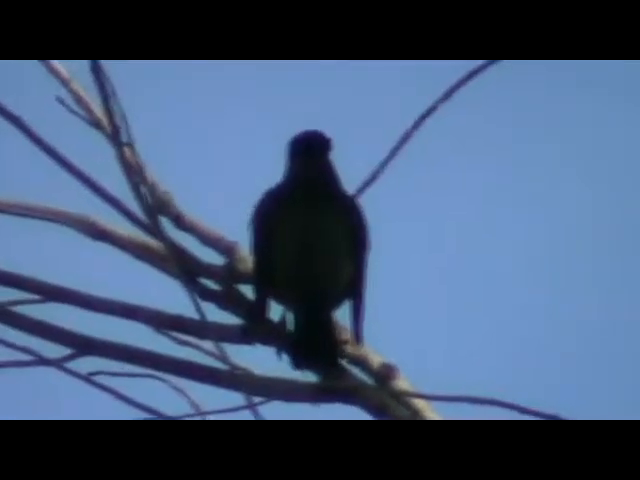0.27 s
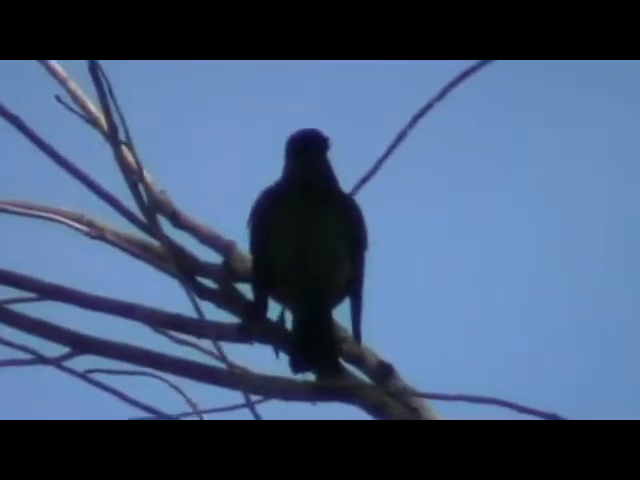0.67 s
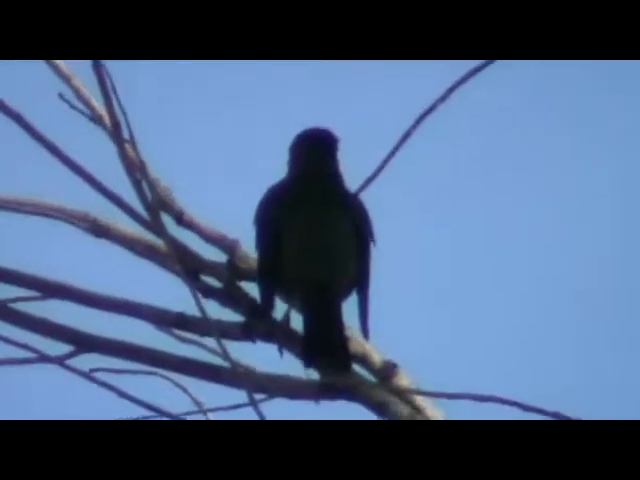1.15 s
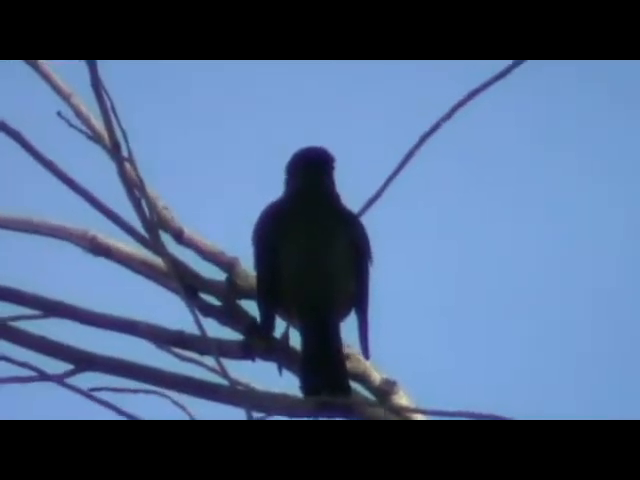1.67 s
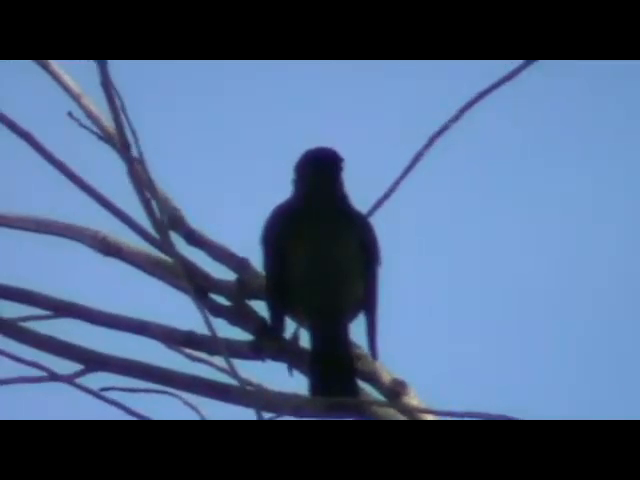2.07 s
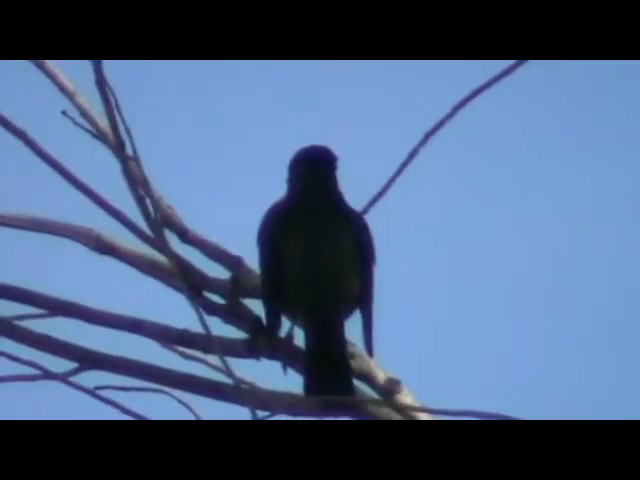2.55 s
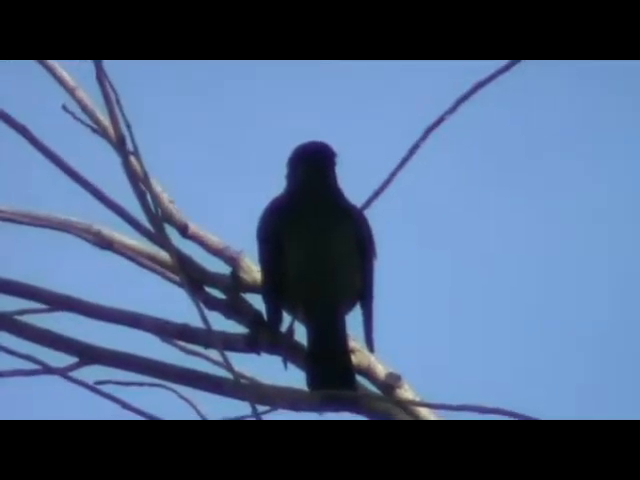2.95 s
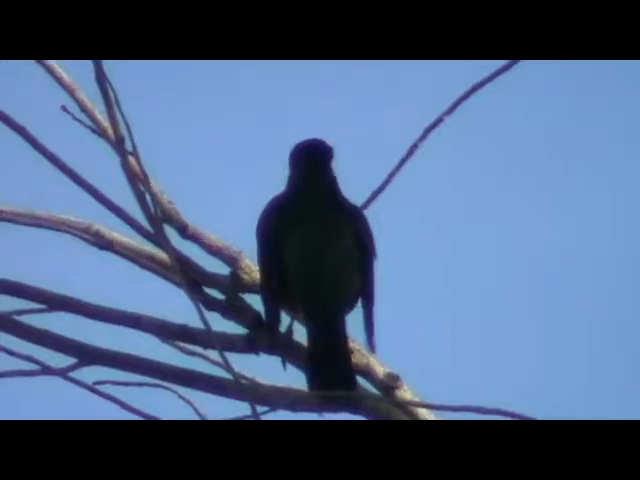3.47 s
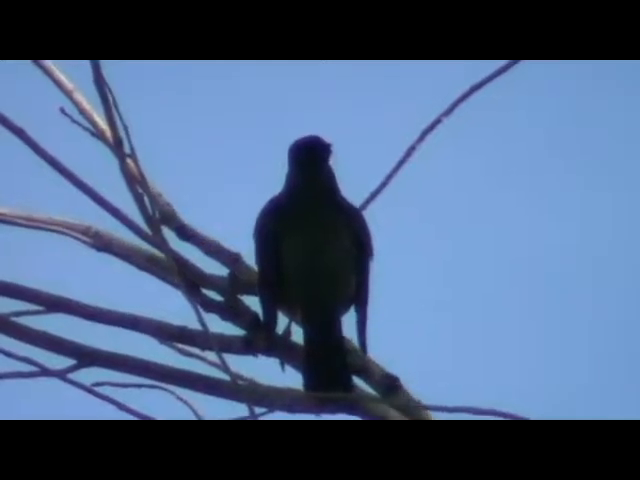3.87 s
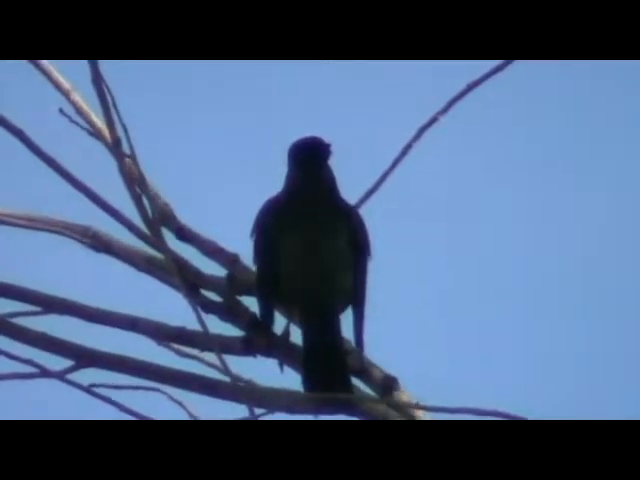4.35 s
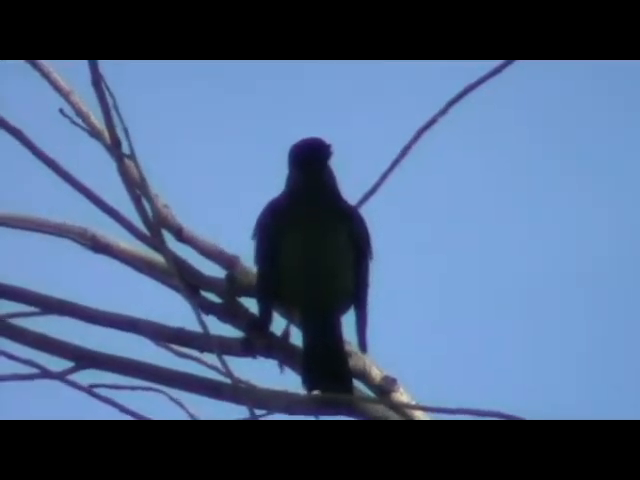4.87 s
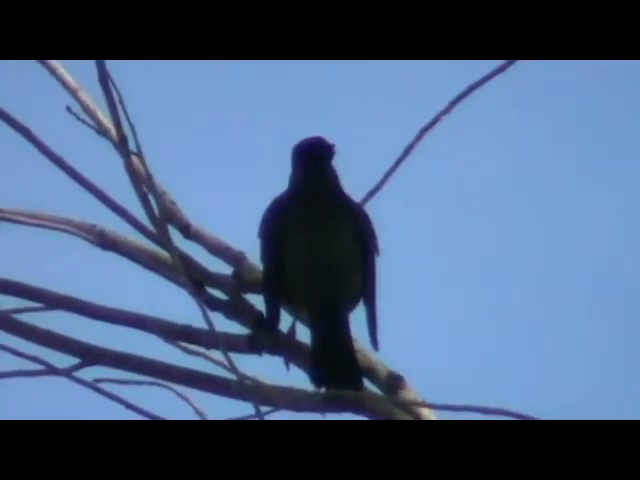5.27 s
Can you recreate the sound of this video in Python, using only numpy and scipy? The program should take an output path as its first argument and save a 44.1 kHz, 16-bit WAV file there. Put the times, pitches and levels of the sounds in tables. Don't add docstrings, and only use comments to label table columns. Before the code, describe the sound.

Outdoor birdsong over a busy road, through a small camera microphone with faint hiss and a very high whine. From 0 to 0.5 s wind bumps low and heavy, a left-hand bird chips rapidly, a thrush gives brief whistles, and the lens drive twitches faintly near 0.27 s. Total silence from 0.5 to 0.85 s. Sound returns with less wind and strong arched whistles until 1.05 s, then another quick group at 1.4-1.6 s. Light twig rustle settles around 1.8 s. A sharp plastic tick lands at 2.0 s. Road roar continues slightly left; a lorry drone drops in pitch around 2.1-2.7 s. A thin call at 2.9 s precedes wavering whistles at 3.4-3.6 s and a faint tick. Twisting notes come at 4.1 s, wavering descending ones at 4.5-4.8 s. Left chips quicken from 4.8 s, a fast high trill peaks at 5.2 s, then a distant falling whistle as an engine climbs.

```python
import sys
import numpy as np
from scipy import signal
from scipy.fft import rfft, irfft, next_fast_len
from scipy.io import wavfile
from scipy.ndimage import uniform_filter1d, map_coordinates

SR = 44100
rng = np.random.default_rng(int(sys.argv[2]) if len(sys.argv) > 2 else 0)


def amplitude_ratio(level_db):
    exponent = np.asarray(level_db, float) / 20
    return 10 ** exponent


def to_wav(s):
    ch = np.atleast_2d(s).T
    pcm = np.round(np.clip(ch, -1, 1) * 32767)
    wavfile.write(sys.argv[1], SR, pcm.astype(np.int16))


N = 242550


def along(points, hz):
    f, v = np.transpose(points)
    return np.interp(np.log(hz + 1), np.log(f + 1), v)


def unit(x):
    return x / np.sqrt(np.mean(x ** 2) + 1e-20)


def curves(rows):
    s, *cols = np.transpose(rows)
    return [np.interp(np.arange(N) / SR, s, c) for c in cols]


def wobble(rate_hz):
    knots = rng.standard_normal(int(N * rate_hz / SR) + 4)
    return map_coordinates(knots, [np.arange(N) * rate_hz / SR])


def filtered(x, response):
    m = next_fast_len(N + SR // 2)
    return irfft(rfft(x, m) * response(np.fft.rfftfreq(m, 1 / SR)), m)[..., :N]


def rush(spectrum, alike, patchy_db):
    z = signal.stft(rng.standard_normal((2, N)), nperseg=512)[2]
    field = rng.standard_normal(z.shape[1:])
    field = uniform_filter1d(uniform_filter1d(field, size=6, axis=0), size=14, axis=1)
    pair = signal.istft(z * amplitude_ratio(patchy_db * unit(field)), nperseg=512)[1][:, :N]

    def mid_side_response(hz):
        turn = np.arccos(np.clip(along(alike, hz), -1, 1)) / 2
        return amplitude_ratio(along(spectrum, hz)) * [np.cos(turn), np.sin(turn)]

    mid, side = filtered(pair, mid_side_response)
    return unit(np.array([mid + side, mid - side]))


def slurs(rows, swell_db, bow=0):
    notes = []
    for s, length, a, b, db in rows:
        middle_hz = (a + b) / 2 + bow * abs(a - b)
        notes.append([(s, a, db - swell_db / 2),
                      (s + length / 2, middle_hz, db + swell_db / 2),
                      (s + length, b, db - swell_db / 2)])
    return notes


def falls(rows, length_s, share):
    return [(s, length_s, hz * (1 + share / 2), hz * (1 - share / 2), db) for s, hz, db in rows]


def whistles(notes, fade_s, inertia_s, flutter_db, overtone_db):
    voice = np.zeros(N + SR, complex)
    half_fade = round(fade_s * SR / 2)
    for s, hz, db in map(np.transpose, notes):
        t = np.arange(round((s[-1] - s[0] + fade_s) * SR)) / SR
        at_s = t + s[0] - fade_s / 2
        inertia = round(inertia_s * SR)
        hz = uniform_filter1d(np.interp(at_s, s, hz), inertia, mode='nearest')
        db = uniform_filter1d(np.interp(at_s, s, db), inertia, mode='nearest')
        edges = np.sin(np.pi / 2 * np.clip(np.minimum(t, t[-1] - t) / fade_s, 0, 1)) ** 2
        first = round((s[0] - fade_s / 2) * SR) + SR // 2
        turns = 2 * np.pi * np.cumsum(hz) / SR
        turns += np.angle(voice[first + half_fade]) - turns[half_fade]
        voice[first:first + len(t)] += np.sqrt(2) * amplitude_ratio(db) * edges * np.exp(1j * turns)
    voice = voice[SR // 2:][:N] * amplitude_ratio(flutter_db * wobble(170))
    octave = voice ** 2 / (np.abs(voice) + 1e-9)
    return (voice + amplitude_ratio(overtone_db) * octave).real


def surroundings(x, t60_s, wet_db, wall_s, wall_db):
    t = np.arange(SR // 2) / SR
    scatter = rng.standard_normal((2, len(t))) * amplitude_ratio(-60 * t / t60_s) * (1 - np.exp(-t / 0.0071))
    answer = amplitude_ratio(wet_db) * scatter / np.linalg.norm(scatter[0])
    answer[0, round(wall_s * SR)] += amplitude_ratio(wall_db)
    answer[1, round((wall_s + .0001) * SR)] += amplitude_ratio(wall_db)
    return signal.fftconvolve(x[None], answer, axes=1)[:, :N]


# f/Hz, density/dB
HISS_SPECTRUM = [(1500, -29.5), (4000, -1), (8000, 3.5), (12000, 1.5), (14600, -0.5), (15300, 0.5),
                 (16000, -1.5)]
# f/Hz, left-right likeness
HISS_LIKENESS = [(4000, .3), (8000, 0.54), (14000, 0.82), (15300, 0.85)]


def amplifier_hiss():
    return amplitude_ratio(-52.5) * rush(HISS_SPECTRUM, HISS_LIKENESS, patchy_db=1.0)


# f/Hz, level/dB
CIRCUIT_TONES = [(10174, -80), (11725, -72)]
# t/s, t/s
BLANK_AT_S = (.0143, .0046)


def line_whistle():
    field_s, blank_s, blank_depth = .02, .0024, .86
    line_hz, line_db = 15625, -57
    t = np.arange(N) / SR
    steady = sum(np.sqrt(2) * amplitude_ratio(db) * np.sin(2 * np.pi * hz * t) for hz, db in CIRCUIT_TONES)
    blank_at_s = np.where(t < DROPOUT_S[1], *BLANK_AT_S)
    from_blank_s = (t - blank_at_s + field_s / 2) % field_s - field_s / 2
    gate = 1 - blank_depth * np.exp(-(from_blank_s / blank_s) ** 4)
    return steady + np.sqrt(2) * amplitude_ratio(line_db) * np.sin(2 * np.pi * line_hz * t) * gate


# t/s, peak/dB
LENS_TWITCHES = [
    (.2732, -39),
    (.2781, -37),
]


def lens_drive():
    ring_hz, width_hz = 13400, 2600
    sparks = np.zeros(N)
    for s, db in LENS_TWITCHES:
        sparks[round(s * SR)] = amplitude_ratio(db + 12)

    def ring(f):
        return (1j * f * width_hz / (ring_hz ** 2 - f * f + 1j * f * width_hz)) ** 2

    return filtered(sparks, ring)


# t/s, peak/dB, left minus right/dB
BODY_TICKS = [
    (2.0161, -25.8, -5),
    (3.5638, -41.5, 8),
]
# f/Hz, width/Hz, level/dB
SHELL_MODES = [(3200, 800, 8), (4800, 1500, 10), (7760, 2200, 7), (13500, 2500, 0)]


def body_ticks():
    slips = [(.0011, -5), (.0014, 1), (.0016, -4), (.002, -8), (.0024, -5)]  # t/s, level/dB
    blows = np.zeros((2, N))
    for s, db, pan_db in BODY_TICKS:
        for late_s, slip_db in slips:
            side_db = pan_db / 2 * np.array([1, -1])
            blows[:, round((s + late_s) * SR)] += amplitude_ratio(db + slip_db + 13.0 + side_db)

    def shell(f):
        modes = sum(amplitude_ratio(db) * 1j * f * w / (c * c - f * f + 1j * f * w) for c, w, db in SHELL_MODES)
        return modes / (1 + 1j * f / 6000)

    return filtered(blows, shell)


def camera():
    return amplifier_hiss() + line_whistle() + lens_drive() + body_ticks()


# f/Hz, density/dB
TWIG_SPECTRUM = [(2000, -32.5), (3500, -4), (5000, 1), (7000, -6.5), (11000, -31)]


def breeze():
    breeze_db, calm_db, settles_s, settling_s = -56, -64, 1.8, .1
    calm = 1 / (1 + np.exp((settles_s - np.arange(N) / SR) / settling_s))
    level_db = breeze_db + (calm_db - breeze_db) * calm
    return amplitude_ratio(level_db) * rush(TWIG_SPECTRUM, [(5000, .4)], patchy_db=4.0)


# t/s, wind and rumble level/dB, roar level/dB
TRAFFIC_LEVELS = [(0, -19.5, -37.5), (.11, -25, -38.5), (.49, -25, -36.5), (.86, -43, -38),
                  (1.07, -34.5, -37.5), (1.3, -41, -36.5), (1.6, -44.5, -37), (2.02, -42.5, -35),
                  (2.23, -46, -37), (2.49, -40, -36.5), (3.47, -45.5, -36.5), (3.9, -43, -37.5),
                  (5.25, -46.5, -36), (5.5, -44.5, -37)]
# f/Hz, density/dB
RUMBLE_SPECTRUM = [(15, -23.5), (30, -7), (60, -0.5), (120, -1.5), (200, -10), (350, -21), (600, -54.5)]
# f/Hz, gain/dB
GUST_COLOUR = [(100, 0), (200, 1), (380, 5.5), (600, 4.5)]
# f/Hz, left port lag/rad
GUST_LAG = [(40, .3), (120, .9), (260, 1.2), (600, .5)]
# f/Hz, density/dB
TYRE_SPECTRUM = [(88, -43.5), (150, -7.5), (214, -8), (375, -5.5), (441, -4.5), (470, -5.5), (866, -1.5),
                 (1100, -5.5), (1420, -6.5), (2030, -11.5), (2460, -15), (3180, -19.5), (7000, -32),
                 (9100, -64), (15400, -120)]
# f/Hz, left-right likeness
TYRE_LIKENESS = [(150, 1), (300, 0.6), (640, 0.77), (1400, 0.36), (3000, 0.12), (7000, 0.11)]
# f/Hz, left minus right/dB
TYRE_PAN = [(60, -2.5), (110, -3.5), (200, 2), (380, 0.5), (700, 4.5), (1290, 4.5), (2380, 7), (4400, 2),
            (8120, 2.5), (15000, -4.5)]
# f/Hz, left port lead/rad
TYRE_LEAD = [(150, 0), (350, .25), (1000, .7), (2200, 0.6), (4000, 0)]


def road():
    rumble_db, roar_db = curves(TRAFFIC_LEVELS)
    windy = np.arange(N) < DROPOUT_S[1] * SR
    sides = np.array([[1], [-1]]) / 2

    lumps = amplitude_ratio(2.2 * wobble(18))
    alike = [(30, .9), (70, .85), (150, .62), (300, .4)]  # f/Hz, likeness
    rumble = unit(lumps * rush(RUMBLE_SPECTRUM, alike, patchy_db=0.5))
    rumble = amplitude_ratio(rumble_db + np.where(windy, -3.5, 4.5)) * rumble

    def gust(hz):
        return amplitude_ratio(along(GUST_COLOUR, hz)) * np.exp(-1j * along(GUST_LAG, hz) * sides)

    rumble = np.where(windy, filtered(rumble, gust), rumble)

    def lean_left(hz):
        return amplitude_ratio(along(TYRE_PAN, hz) * sides) * np.exp(1j * along(TYRE_LEAD, hz) * sides)

    spectrum = [(60, -67.5)] + TYRE_SPECTRUM + [(14000, -67.5)]
    roar = filtered(rush(spectrum, TYRE_LIKENESS, patchy_db=0.16), lean_left)
    return rumble + amplitude_ratio(roar_db + 2.0 + 0.39 * wobble(6)) * roar


# t/s, firing f/Hz, level/dB
BRAKING_LORRY = [
    (.85, 110.9, -38),
    (1.2, 109.8, -52),
    (1.7, 109.5, -38),
    (2.14, 108.6, -35),
    (2.35, 102.5, -39.5),
    (2.7, 95.8, -55),
]
# t/s, firing f/Hz, level/dB
CLIMBING_LORRY = [
    (2.8, 66, -46),
    (3.3, 67.43, -41),
    (3.65, 66.4, -38),
    (4, 67.5, -44),
    (4.6, 68.2, -41.5),
    (5, 68.3, -37),
    (5.5, 70.1, -34.5),
]
# from t/s, to t/s, from f/Hz, to f/Hz, loudest level/dB
ENGINE_PASSES = [(0, .45, 100.6, 111.5, -37), (0, .45, 61, 76, -35), (0, .45, 142.5, 149, -37),
                 (2.35, 3, 109.8, 111.5, -44), (.9, 2.05, 135, 138.5, -40), (.9, 2.2, 187, 191.5, -49),
                 (.85, 2.2, 76.5, 74.5, -42), (3.25, 3.65, 141.5, 143.5, -37),
                 (4.05, 5.5, 144.5, 149.5, -37), (3.6, 5, 134, 137, -35.5), (3.5, 4, 95, 80.5, -47),
                 (4.3, 5.5, 83, 86, -40)]


def drones():
    octave_db, fade_db = -14.5, 6.5
    octave = [(s, 2 * hz, db + octave_db) for s, hz, db in BRAKING_LORRY]
    passes = [(s, end - s, a, b, db - fade_db / 2) for s, end, a, b, db in ENGINE_PASSES]
    return [BRAKING_LORRY, octave, CLIMBING_LORRY] + slurs(passes, swell_db=fade_db)


def engines():
    hum, t = np.zeros((2, N)), np.arange(N) / SR
    for rows in drones():
        hz, db = curves(rows)
        present = np.clip(np.minimum(t - rows[0][0] + 0.16, rows[-1][0] + 0.15 - t) / 0.13, 0, 1)
        turns = 2 * np.pi * np.cumsum(hz) / SR + 0.27 * wobble(7.2)
        apart_rad = rng.uniform(.14, .4) * np.array([[1], [-1]])
        hum += present * np.sqrt(2) * amplitude_ratio(db + 2.5 * wobble(9)) * np.sin(turns + apart_rad)
    return hum * amplitude_ratio([[.4], [-.4]])


# t/s, middle f/Hz, level/dB
CHIPS = [(.044, 3500, -42), (.124, 2950, -41), (.217, 3000, -47), (.292, 3010, -43), (.41, 2970, -45),
         (.44, 2146, -42.5), (1.307, 3890, -49.5), (4.794, 2970, -43), (4.875, 3000, -48),
         (4.953, 2920, -44), (5.03, 3500, -45), (5.113, 2900, -36), (5.185, 2870, -41), (5.263, 2930, -45),
         (5.342, 3240, -43), (5.422, 2700, -42.5), (5.493, 4600, -47.5)]
# t/s, f/Hz, level/dB
SWOOP = [
    (.355, 5850, -38.5),
    (.359, 5020, -31),
    (.363, 4380, -40),
    (.371, 3940, -42.5),
    (.379, 3640, -43),
]
# t/s, length/s, from f/Hz, to f/Hz, level/dB
THIN_TONES = [(.362, .013, 5200, 5030, -52), (2.905, .016, 5000, 6100, -48), (2.915, .012, 9000, 9400, -57),
              (4.34, .016, 6500, 6600, -63), (4.378, .016, 5850, 5750, -60), (4.39, .016, 5350, 5200, -61),
              (4.64, .03, 5720, 5600, -61), (4.745, .03, 5300, 5200, -61), (4.43, .012, 4500, 4800, -60),
              (4.52, .028, 4950, 5300, -54), (4.465, .02, 5050, 5000, -60), (4.35, .02, 7200, 5600, -63),
              (4.838, .014, 5250, 5150, -64), (3.425, .02, 5100, 5120, -56), (3.72, .018, 5250, 5200, -59),
              (4.941, .003, 5000, 4500, -49), (.211, .006, 4150, 3850, -44)]


def chipping_bird():
    chips = falls(CHIPS, length_s=.006, share=.22)
    calls = [SWOOP] + slurs(THIN_TONES + chips, swell_db=2.2, bow=.1)
    voice = whistles(calls, fade_s=.003, inertia_s=.002, flutter_db=3.5, overtone_db=-22)
    far = surroundings(voice, t60_s=.25, wet_db=-7, wall_s=0.027, wall_db=-27)
    return voice * amplitude_ratio([[4.], [-8.]]) + far


# t/s, length/s, top f/Hz, level/dB
TRILL_LOOPS = [
    (5.169, .034, 6750, -37),
    (5.204, .029, 6250, -35),
    (5.238, .026, 6050, -35),
]


def loops():
    from_hz, knee_hz, end_hz = 3850, 4850, 2700
    top, knee = .22, .62
    over_db, down_db, out_db = -8, -1, -7
    notes = []
    for s, length, top_hz, db in TRILL_LOOPS:
        notes.append([(s, from_hz, db),
                      (s + top * length / 2, (from_hz + top_hz) / 2, db),
                      (s + top * length, top_hz, db + over_db),
                      (s + knee * length, knee_hz, db + down_db),
                      (s + length, end_hz, db + out_db)])
    return notes


# t/s, f/Hz, level/dB
WIND_UP = [
    (5.085, 6100, -58),
    (5.105, 5900, -60),
    (5.115, 5720, -50),
    (5.131, 5450, -49),
    (5.141, 6900, -47),
    (5.148, 6150, -45),
    (5.16, 5400, -46),
    (5.169, 3850, -38),
]
# t/s, f/Hz, level/dB
RING_OUT = [
    (5.28, 4620, -43),
    (5.29, 4690, -46),
    (5.3, 4920, -51),
    (5.306, 4860, -49),
    (5.32, 4860, -50),
    (5.335, 4980, -51),
    (5.347, 4800, -52),
]
# t/s, length/s, from f/Hz, to f/Hz, level/dB
TRILL_END = [
    (5.2, .006, 2850, 2600, -40),
    (5.264, .006, 2950, 2750, -43),
    (5.257, .018, 6050, 6200, -55),
    (5.26, .018, 4300, 4900, -53),
    (5.28, .024, 5700, 6050, -51),
    (5.305, .013, 6100, 6250, -57),
    (5.281, .009, 4100, 2600, -46),
]
# t/s, length/s, from f/Hz, to f/Hz, level/dB
UNDERTONE = [
    (5.09, .034, 3800, 3900, -59),
    (5.172, .012, 4050, 3900, -49),
    (5.197, .01, 4200, 4700, -56),
    (5.217, .012, 3950, 4050, -47),
    (5.226, 0.013, 4850, 4750, -47),
    (5.267, .008, 3300, 4700, -50),
]
# f/Hz, gain/dB
BEAK = [(2500, -4), (3500, -0.5), (4800, 2.5), (6800, -3.5)]


def thrush_trill():
    notes = [WIND_UP, RING_OUT] + loops() + slurs(TRILL_END + UNDERTONE, swell_db=1.5)
    trill = whistles(notes, fade_s=.003, inertia_s=.003, flutter_db=1.3, overtone_db=-40)
    trill = filtered(trill, lambda hz: amplitude_ratio(along(BEAK, hz)))
    far = surroundings(trill, t60_s=.11, wet_db=-4, wall_s=.017, wall_db=-15)
    return trill * amplitude_ratio([[.6], [-.6]]) + far


# t/s, f/Hz, level/dB
ARCHES = [
    [(.882, 2374, -49), (.895, 2686, -35), (.905, 2805, -29.5), (.915, 3065, -37), (.924, 3120, -28),
     (.94, 3200, -30), (.952, 3157, -29), (.959, 2850, -38), (.965, 3200, -47)],
    [(.967, 2800, -40), (.975, 3090, -31), (.981, 3170, -27), (.986, 3260, -31), (.998, 3150, -27),
     (1.006, 3000, -33), (1.016, 2860, -28.5), (1.034, 2730, -26.5), (1.046, 2600, -40)],
    [(1.375, 2560, -44), (1.383, 2950, -42), (1.39, 3140, -32), (1.399, 3130, -30), (1.404, 3120, -37),
     (1.409, 2800, -31), (1.415, 2680, -36), (1.421, 2520, -46)],
    [(1.425, 2500, -40), (1.429, 2890, -34), (1.434, 3020, -45), (1.44, 3100, -42), (1.444, 2980, -43),
     (1.451, 2880, -29.5), (1.458, 2670, -37), (1.464, 2850, -46)],
    [(1.497, 3170, -48), (1.507, 3330, -46), (1.514, 3450, -36), (1.522, 3500, -40), (1.528, 3540, -37),
     (1.535, 3340, -27.5), (1.54, 3160, -32), (1.545, 3000, -32)],
    [(1.551, 3550, -48), (1.56, 3700, -38), (1.565, 3870, -40), (1.57, 3680, -32.5), (1.575, 3430, -42),
     (1.579, 3350, -33), (1.585, 3120, -40), (1.589, 3350, -46)],
]
# t/s, f/Hz, level/dB
WAVERS = [
    [(3.432, 3010, -52), (3.45, 3075, -37), (3.46, 3135, -37), (3.468, 3125, -33), (3.487, 3108, -30),
     (3.504, 3040, -35), (3.511, 3045, -34), (3.516, 3035, -44)],
    [(4.508, 2200, -50), (4.516, 2290, -48), (4.528, 2470, -39), (4.535, 2590, -45), (4.545, 2645, -41),
     (4.555, 2615, -37), (4.561, 2500, -47)],
    [(4.563, 2520, -36), (4.57, 2500, -40), (4.578, 2495, -36), (4.592, 2620, -41), (4.605, 2750, -35),
     (4.626, 2940, -37), (4.635, 2930, -34), (4.638, 2800, -36)],
    [(4.64, 2790, -36), (4.65, 2830, -39), (4.656, 2850, -35), (4.665, 2810, -34), (4.675, 2760, -35),
     (4.681, 2730, -46)],
]
# t/s, f/Hz, level/dB
TWISTS = [
    [(3.518, 2990, -43), (3.526, 2870, -36), (3.534, 2640, -36), (3.54, 2810, -32), (3.547, 2960, -39),
     (3.555, 2850, -36), (3.561, 2980, -38), (3.565, 2800, -48)],
    [(3.568, 2870, -41), (3.575, 2850, -38), (3.581, 2950, -44), (3.587, 2950, -50)],
    [(4.086, 2700, -51), (4.091, 3280, -36), (4.098, 3380, -33.5), (4.105, 3420, -36), (4.11, 3500, -44),
     (4.116, 3500, -37), (4.122, 3650, -40), (4.127, 4100, -50)],
    [(4.132, 3150, -37), (4.136, 3330, -35), (4.141, 3680, -42), (4.145, 3300, -35), (4.149, 2800, -42),
     (4.152, 3250, -36), (4.163, 3150, -39), (4.18, 3250, -50)],
    [(4.037, 3250, -55), (4.044, 3800, -47), (4.055, 3770, -46), (4.06, 3650, -49), (4.067, 3675, -43),
     (4.072, 3700, -46), (4.078, 4400, -54)],
    [(4.421, 3600, -56), (4.43, 3710, -53), (4.45, 3860, -52), (4.465, 4020, -52), (4.476, 4060, -54),
     (4.497, 3980, -55)],
]
# t/s, f/Hz, level/dB
HIGH_PIPS = [
    [(4.666, 3960, -54), (4.674, 4040, -48), (4.681, 4000, -44), (4.691, 3860, -48), (4.696, 3700, -57),
     (4.705, 3700, -43), (4.715, 3700, -46), (4.723, 3590, -45), (4.733, 3640, -35)],
    [(4.735, 3650, -36), (4.745, 3600, -50), (4.75, 3570, -44), (4.76, 3380, -52), (4.766, 3420, -52),
     (4.776, 3400, -38), (4.785, 3380, -47), (4.79, 3320, -42), (4.796, 3300, -52)],
]
# t/s, f/Hz, level/dB
LOW_PIPS = [
    (4.695, 2790, -37),
    (4.718, 2725, -34),
    (4.74, 2714, -32),
    (4.761, 2650, -36),
    (4.784, 2630, -45),
]
# t/s, length/s, from f/Hz, to f/Hz, level/dB
SONG_SLURS = [(0, 0.029, 2810, 2700, -33.5), (.043, 0.03, 2920, 2760, -37.5),
              (.447, .018, 5210, 4800, -54.5), (.47, 0.024, 4540, 5480, -50.5),
              (.479, 0.022, 2974, 3290, -35), (.865, 0.018, 2740, 3280, -47.5),
              (.879, .022, 3230, 3400, -43.5), (.903, .02, 3400, 3560, -52), (1.015, .024, 3300, 3600, -49),
              (1.551, 0.008, 2950, 3200, -40), (3.598, .006, 2900, 3150, -53),
              (3.64, .015, 3030, 2850, -50), (3.665, .013, 2950, 2880, -50), (3.718, .01, 3080, 3000, -53),
              (4.38, 0.023, 2950, 3200, -51), (4.091, .028, 6650, 7250, -59),
              (4.134, .008, 6600, 6950, -59)]
# t/s, f/Hz, level/dB
FAR_CALL = [
    (5.35, 5750, -60),
    (5.38, 5100, -58),
    (5.41, 4320, -58),
    (5.44, 3790, -56),
    (5.505, 3480, -54),
]


def thrush_song():
    pips = falls(LOW_PIPS, length_s=.009, share=.02)
    glides = slurs(SONG_SLURS + pips, swell_db=2.5, bow=.2)
    notes = ARCHES + WAVERS + TWISTS + HIGH_PIPS + [FAR_CALL] + glides
    song = whistles(notes, fade_s=.004, inertia_s=.002, flutter_db=1.6, overtone_db=-31)
    wall = surroundings(song, t60_s=.7, wet_db=-11.5, wall_s=.228, wall_db=-21)
    boughs = surroundings(song, t60_s=.07, wet_db=-13, wall_s=.009, wall_db=-18)
    return song * amplitude_ratio([[.3], [-.3]]) + wall + boughs


def scene():
    background = camera() + breeze() + road() + engines()
    return background + chipping_bird() + thrush_trill() + thrush_song()


def roll_off(x):
    return signal.sosfilt(signal.butter(12, 16800, fs=SR, output="sos"), x)


# from t/s, to t/s
DROPOUT_S = (.4966, .8488)


def record(dry):
    t = np.arange(N) / SR
    top_hz = 15800
    present = (t < DROPOUT_S[0]) | (t > DROPOUT_S[1])
    kept = filtered(dry, lambda hz: hz < top_hz) * present
    return roll_off(kept)


dry = scene()
out = record(dry)
to_wav(out)
```